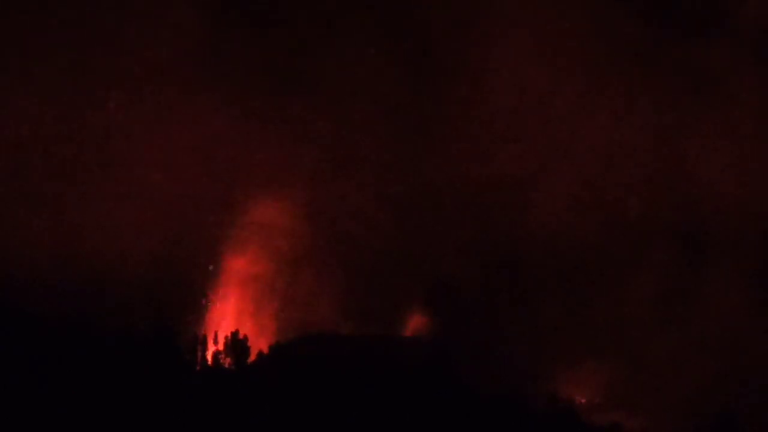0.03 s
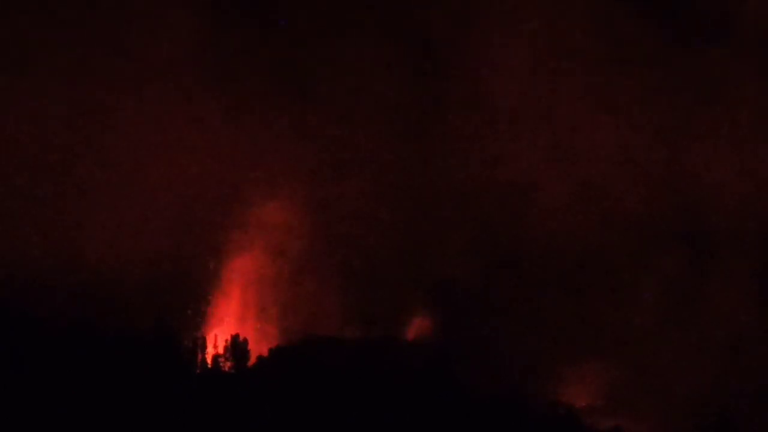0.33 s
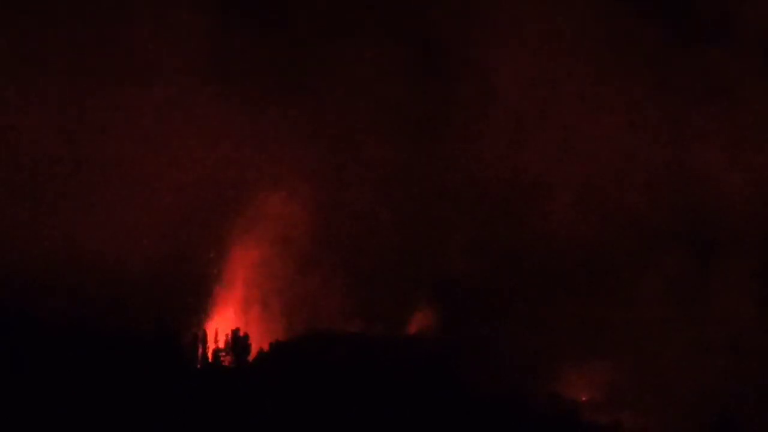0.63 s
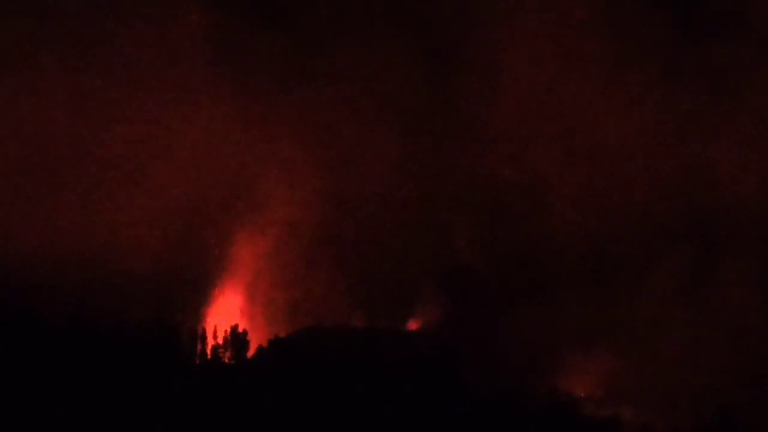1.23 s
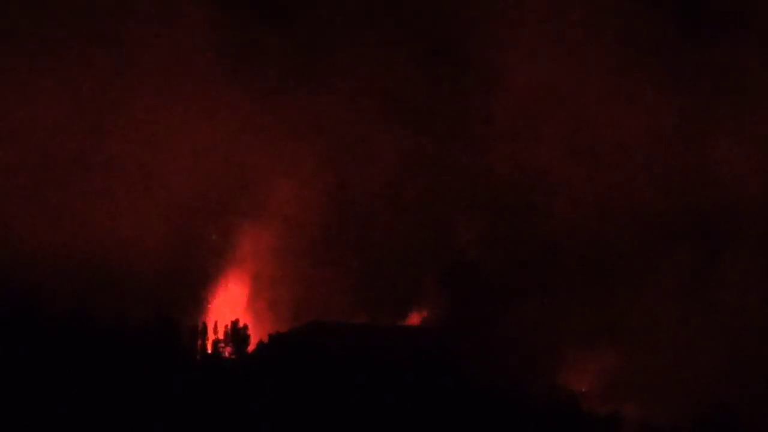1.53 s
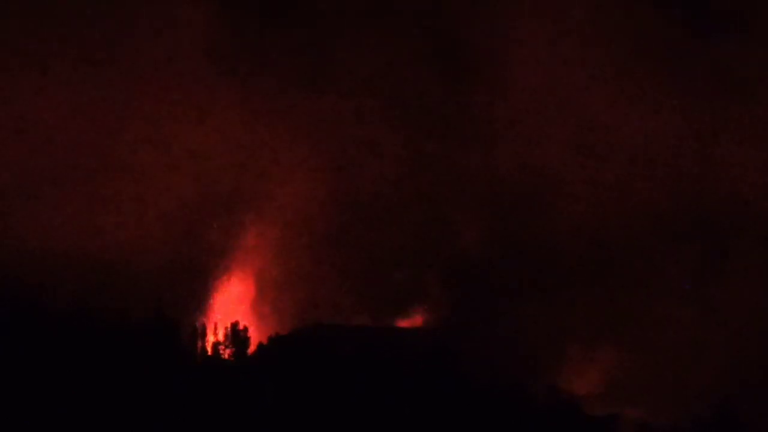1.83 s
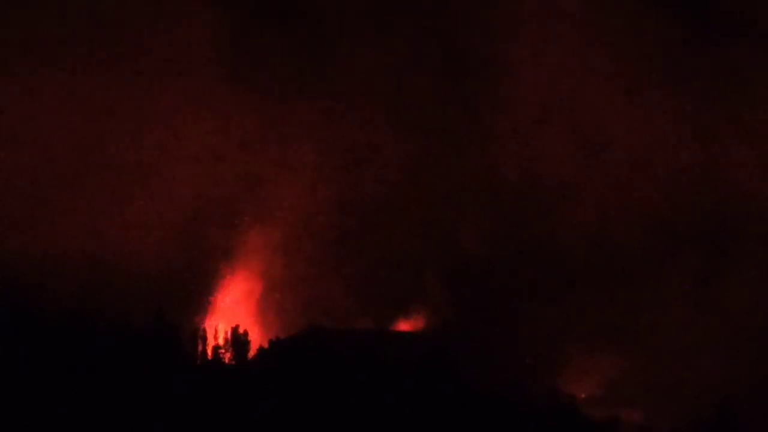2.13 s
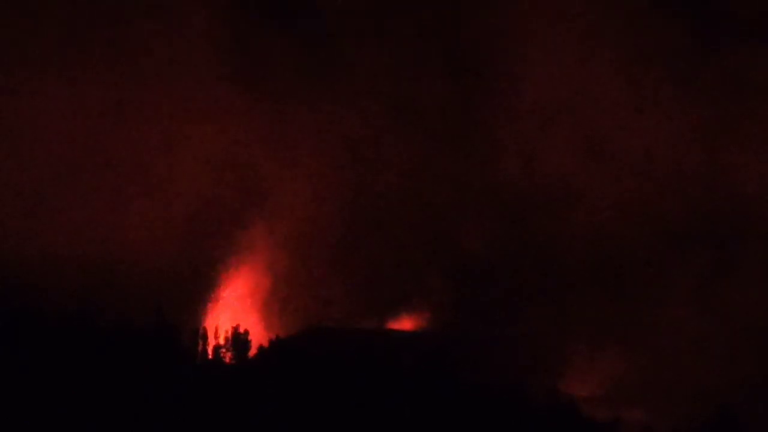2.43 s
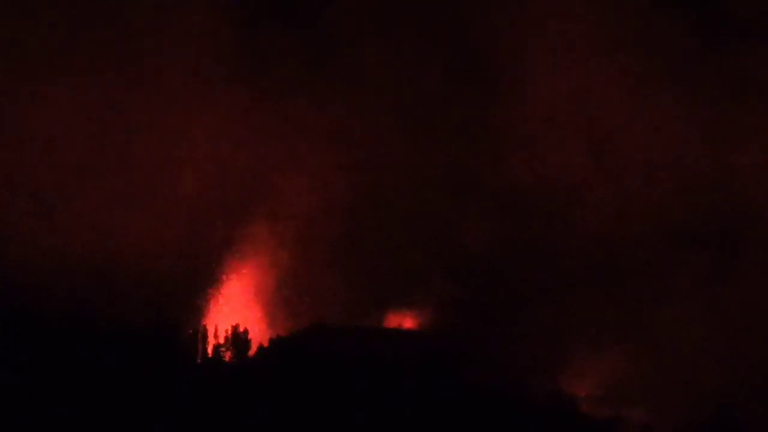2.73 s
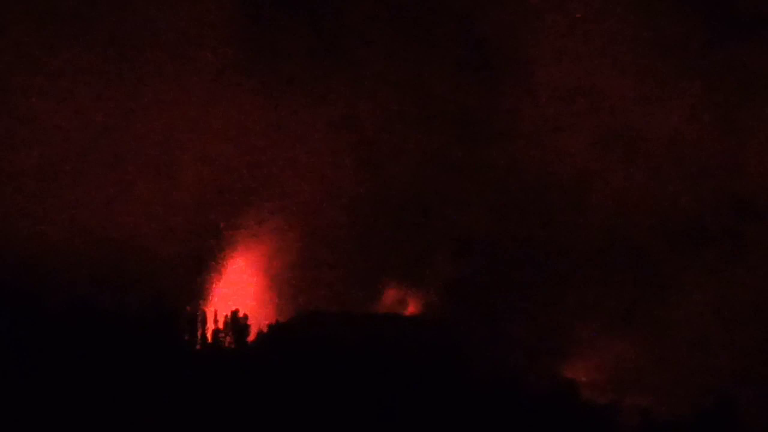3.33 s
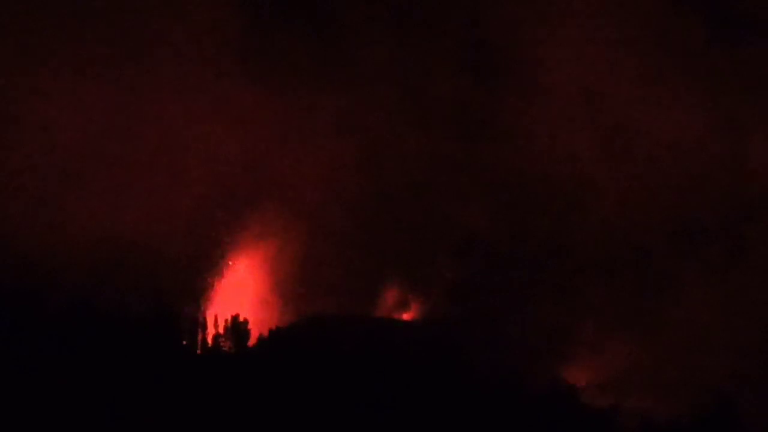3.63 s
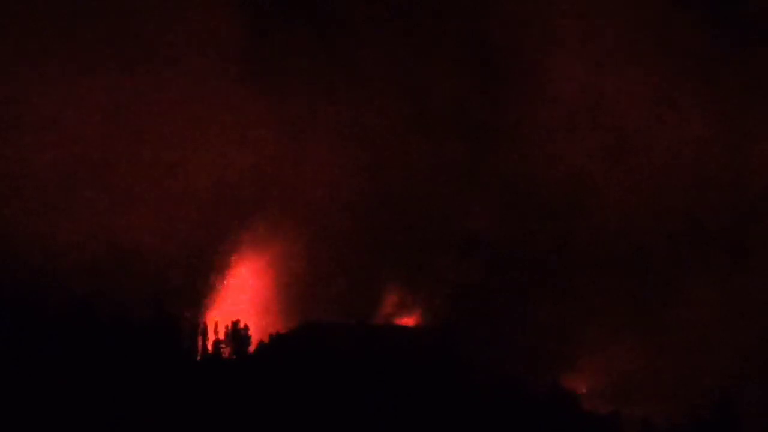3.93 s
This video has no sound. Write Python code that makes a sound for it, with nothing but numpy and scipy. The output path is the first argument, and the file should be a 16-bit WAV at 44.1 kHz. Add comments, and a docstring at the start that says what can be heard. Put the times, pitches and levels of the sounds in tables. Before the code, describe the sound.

Uneven gusts of wind pop and rumble right on the microphone, with thin hiss and a far-off lava fountain barely audible underneath. As the wind weakens, the camera is gripped anew, with two sharp clicks and a light rustle.

```python
"""Short, uneven puffs of wind buffet a hand-held camera's microphone, a few early ones with a slight crack.
Under them the steady wind makes a low rumble that slowly eases. It is night, far from a lava
fountain: its faint roar lies behind the wind, with a thin microphone hiss. The camera ticks faintly
in the hand; near the end it is gripped anew: a low thump, two sharp clicks, a soft rustle."""
import sys
import numpy as np
from scipy import signal
from scipy.fft import rfft, irfft, next_fast_len
from scipy.io import wavfile
from scipy.ndimage import map_coordinates

SR = 44100
rng = np.random.default_rng(int(sys.argv[2]) if len(sys.argv) > 2 else 0)


def log_audio(samples):
    """Write samples as a 16-bit WAV file to the path given in sys.argv[1]."""
    # one column per channel
    frames = np.atleast_2d(samples).T
    # limit to full scale, then quantise
    limited = np.clip(frames, -1, 1)
    pcm = np.round(limited * 32767).astype(np.int16)
    wavfile.write(sys.argv[1], SR, pcm)


N = 176400

# Turbulence right at the microphone, for eddies of EDDY_HZ. Each row: frequency in Hz, density in dB.
EDDY_SPECTRUM = [(30, -9), (100, 5), (200, -0.5), (320, -2), (500, -13.5), (720, -25), (1000, -35.5),
                 (1500, -53), (2500, -68), (7000, -100)]
EDDY_HZ = 300
# Puffs striking the microphone. Each row: centre in seconds, length in seconds,
# level in dB before PUFF_GAIN_DB, eddy frequency in Hz (higher is brighter).
WIND_PUFFS = [(0.009, 0.051, -21.5, 375), (0.033, 0.024, -22.5, 380), (0.13, 0.027, -22.5, 353),
              (0.167, 0.02, -25, 310), (.235, 0.015, -24, 280), (0.264, 0.02, -21.5, 290),
              (0.289, 0.024, -19, 210), (0.308, 0.017, -23.5, 427), (0.397, 0.049, -25.5, 300.6),
              (0.505, 0.025, -18.5, 353), (0.556, 0.03, -23, 330), (0.715, 0.02, -19, 298),
              (0.836, 0.02, -26, 288), (0.891, 0.034, -31.5, 226), (.989, 0.013, -26, 290),
              (1.015, 0.019, -19.5, 327), (1.037, 0.015, -26.5, 355), (1.169, 0.035, -27.5, 333),
              (1.196, 0.0082, -23.5, 290), (1.294, 0.016, -26.5, 300), (1.318, 0.013, -21.5, 240),
              (1.343, 0.036, -20.5, 237), (1.458, 0.035, -24.5, 290), (1.556, 0.019, -26.5, 249),
              (1.621, 0.021, -22.5, 299), (1.649, 0.032, -26, 333), (1.841, 0.027, -29, 282),
              (1.931, 0.028, -25.5, 203), (2.045, 0.016, -30.5, 220), (2.102, 0.0073, -24.5, 237),
              (2.143, 0.019, -23.5, 282), (2.292, 0.044, -27.5, 338), (2.335, 0.009, -23, 235),
              (2.388, 0.012, -22.5, 239), (2.492, 0.022, -27, 330), (2.598, 0.019, -25.5, 230),
              (2.788, 0.013, -18.5, 259), (2.813, 0.035, -26, 289), (2.852, 0.024, -24, 289),
              (3.05, 0.023, -34, 160), (3.393, 0.028, -25, 215), (3.447, 0.05, -24.5, 200),
              (3.534, 0.0059, -25.5, 205), (3.62, 0.01, -27.5, 270), (3.633, 0.014, -21.5, 232),
              (3.87, 0.039, -27.5, 232)]
PUFF_GAIN_DB, PUFF_STEEPNESS = 0.5, 2.54
FLUTTER_DB, FLUTTER_KNOTS_PER_S = 2.5, 210


def wind_puffs(size=16384):
    """Each puff is a ragged swell of turbulence; faster eddies shift its whole spectrum up."""
    out = np.zeros(N)
    t = (np.arange(size) - size // 2) / SR
    for centre, length, db, eddy_hz in WIND_PUFFS:
        knots = 200 + t * FLUTTER_KNOTS_PER_S
        flutter = map_coordinates(rng.standard_normal(400), [knots], mode="mirror")
        swell = np.exp(-.5 * np.abs(2 * t / length) ** PUFF_STEEPNESS)
        colour = lambda hz: gain_at(EDDY_SPECTRUM, hz * EDDY_HZ / eddy_hz)
        eddies = filtered(rng.standard_normal(size), colour)
        pressure = filtered(swell * amp(FLUTTER_DB * flutter) * eddies, mic_low_cut)
        pressure *= np.linalg.norm(swell) / np.linalg.norm(pressure)
        add(out, amp(db + PUFF_GAIN_DB) * pressure, round(centre * SR) - size // 2)
    return out


# Pops of small eddies at the microphone port and, at 3.174 s, the low thump of the camera being
# gripped, under the sharp click. Each row: time in seconds, peak in dB, tone in Hz (higher is brighter).
POPS_AND_THUMP = [(0.034, -15, 460), (.114, -16, 439), (0.129, -16, 350), (.263, -16, 420),
                  (0.267, -13.5, 230), (0.281, -20, 140), (0.2976, -14, 230), (0.306, -16, 430),
                  (0.503, -16, 422), (0.511, -22, 400), (0.542, -16.5, 340), (0.714, -20, 318),
                  (1.007, -15.5, 393), (1.016, -23.5, 383), (1.1835, -18, 380), (1.195, -15.5, 270),
                  (1.457, -17, 302), (1.622, -16, 280), (1.642, -20, 330), (2.137, -20.5, 280),
                  (2.278, -17.5, 390), (2.284, -14, 200), (2.295, -13, 190), (2.306, -17, 200),
                  (2.46, -11.5, 260), (2.488, -10, 310), (2.4958, -13.5, 370), (2.785, -19.5, 290),
                  (2.817, -18, 350), (2.845, -18.5, 367), (3.174, -24, 238), (3.4, -16.5, 220),
                  (3.621, -18.5, 320), (3.636, -13, 245)]


def pops_and_thump(size=4096, tilt_db_per_octave=4, port_top_hz=2420):
    """Each wind pop, and the thump of the grip, is one pressure pulse, a push or a pull."""
    out = np.zeros(N)
    port = lambda hz: mic_low_cut(hz) / (1 + (hz / port_top_hz) ** 4)
    for time, db, tone_hz in POPS_AND_THUMP:
        phase = np.exp(2j * np.pi * rng.random())
        tone = lambda hz: gain_at(EDDY_SPECTRUM, hz * EDDY_HZ / tone_hz)
        tilt = lambda hz: amp(tilt_db_per_octave * np.log2(1 + hz / tone_hz))
        colour = lambda hz: phase * port(hz) * tone(hz) * tilt(hz)
        pulse = filtered(signal.unit_impulse(size, "mid"), colour)
        add(out, amp(db) * pulse / np.abs(pulse).max(), round(time * SR) - size // 2)
    return out


# Slight cracks of microphone overload on a few early puffs. Each row: start in seconds, peak in dB.
OVERLOADS = [(.122, -43), (.2685, -40), (.2898, -39), (1.0055, -43), (1.0175, -41.5)]
# The tone of one crack. Each row: frequency in Hz, density in dB.
CRACK_SPECTRUM = [(1500, 11), (6000, -17), (16000, -25.5)]


def overload_cracks(size=1024):
    """Each brief overload puts one sharp edge on its puff."""
    out = np.zeros(N)
    edge = impulse(lambda hz: gain_at(CRACK_SPECTRUM, hz), size)
    for start, db in OVERLOADS:
        add(out, amp(db) * edge / np.abs(edge).max(), round(start * SR))
    return out


# Steady wind across the microphone. Each row: time in seconds, level in dB before gain_db.
BREEZE_LEVELS = [(.6, -35), (.85, -34.5), (1.15, -42), (1.72, -34), (2.3, -32), (2.7, -36), (2.9, -36),
                 (3.13, -46.5), (3.42, -40.5), (3.8, -42.5)]
# Its rumble ahead of the microphone's bass roll-off. Each row: frequency in Hz, density in dB.
BREEZE_SPECTRUM = [(25, -8.5), (60, 6.5), (110, 5.5), (190, -1), (300, -10), (450, -24.5), (700, -35.5),
                   (1500, -77)]


def breeze(gain_db=2, flutter_db=2):
    """The steady wind makes a dull, fluttering rumble between the puffs."""
    rumble = unit(filtered(noise(BREEZE_SPECTRUM), mic_low_cut))
    return amp(curve(BREEZE_LEVELS) + gain_db + flutter_db * wobble(35)) * rumble


# The camera body, heard at its own microphone. Each row: frequency in Hz, density in dB.
BODY_SPECTRUM = [(900, -2.5), (2700, -8), (4200, -0.5), (5500, -4), (6800, -1.5), (8500, -23), (11000, -23),
                 (12500, -7.5), (15600, -3)]
# The camera ticking in the hand.
# Each row: start in seconds, level in dB, treble tilt in dB per octave, ring frequency in Hz.
HANDLING_CLICKS = [(.7485, -49, -12.5, 3150), (.851, -49, -13.5, 3400), (2.984, -57.5, -5.5, 3900),
                   (3.055, -51, -12.5, 3900), (3.171, -30, -13, 4070), (3.2013, -46.5, -12, 4020),
                   (3.391, -43.5, 0.5, 6200), (3.4345, -32, 0.5, 3800)]
SNAP_S = 0.00084  # a snap has the energy of its level held this long
RING_DB, RING_WIDTH_HZ = 8, 320  # resonance of the part that is touched
RATTLE_DB, RATTLE_T60_S = -14, .05


def handling_clicks(size=4096):
    """Dry snaps of the camera body: one blow, a short ring and a faint rattle."""
    out, t = np.zeros(N), np.arange(size) / SR
    for start, db, tilt, ring_hz in HANDLING_CLICKS:
        ring = lambda hz: RING_DB / (1 + ((hz - ring_hz) / RING_WIDTH_HZ) ** 2)
        colour = lambda hz: gain_at(BODY_SPECTRUM, hz) * amp(tilt * np.log2(1 + hz / 2000) + ring(hz))
        rattle = amp(-60 * t / RATTLE_T60_S) * filtered(rng.standard_normal(size), colour)
        snap = unit(impulse(colour, size)) + amp(RATTLE_DB) * unit(rattle)
        add(out, amp(db) * snap * np.sqrt(SNAP_S * SR / size), round(start * SR))
    return out


# A light brush of the hand, close to the microphone. Each row: time in seconds, level in dB.
BRUSH_LEVELS = [(.45, -100), (.72, -72), (.92, -71.5), (1.2, -100)]
# The tone of that brush. Each row: frequency in Hz, density in dB.
BRUSH_SPECTRUM = [(700, -4.5), (1650, 0), (3500, -11.5), (9000, -30)]
# Fingers sliding to a new grip. Each row: time in seconds, level in dB.
SLIDE_LEVELS = [(3.15, -110), (3.23, -79.5), (3.29, -62.5), (3.345, -67.5), (3.39, -61.5), (3.47, -69.5),
                (3.53, -61.5), (3.58, -66.5), (3.75, -95.5), (4, -110)]


def hand_rustle(grain_db=7.5):
    """A hand brushes the camera; later the fingers slide over it in fine, even grains."""
    slide = unit(noise(BODY_SPECTRUM) * amp(grain_db * np.tanh(wobble(300))))
    return amp(curve(SLIDE_LEVELS)) * slide + amp(curve(BRUSH_LEVELS)) * noise(BRUSH_SPECTRUM)


# The lava fountain, far off in the night. Each row: time in seconds, level in dB about level_db.
FOUNTAIN_SWELL = [(0, 4.5), (.8, 3.5), (1.15, 0.5), (3.2, -4), (4, 0.5)]
# Its roar from this distance. Each row: frequency in Hz, density in dB.
FOUNTAIN_SPECTRUM = [(60, -8.5), (300, -0.5), (600, -1), (1000, -9), (1500, -17.5), (2200, -30),
                     (4000, -54)]


def lava_fountain(level_db=-59):
    """The distant eruption arrives as a faint, wavering roar."""
    return amp(level_db + curve(FOUNTAIN_SWELL) + wobble(6)) * noise(FOUNTAIN_SPECTRUM)


# The microphone's noise floor. Each row: frequency in Hz, density in dB.
HISS_SPECTRUM = [(500, -1.5), (2500, -1.5), (4300, -1), (5400, -10), (6700, -3), (8500, -15.5),
                 (11000, -22.5), (12200, -4), (13400, -4), (15600, -1.5)]


def mic_hiss(level_db=-72):
    """The microphone adds a thin, steady hiss of its own."""
    return amp(level_db) * noise(HISS_SPECTRUM)


def mic_low_cut(hz, corner_hz=87.2, leak_db=-32.5):
    """Gain of the microphone's bass roll-off; a little rumble slips under it."""
    steep = (hz / corner_hz) ** 5
    return (steep + amp(leak_db) * hz / (hz + 10)) / (1 + steep)


def amp(db):
    """Gain of a level in dB."""
    return 10 ** (np.asarray(db) / 20)


def unit(x):
    """Scaled to rms 1."""
    return x / np.sqrt(np.mean(x ** 2) + 1e-20)


def gain_at(spectrum, hz):
    """Gain from (Hz, dB) rows, read on a log frequency axis."""
    row_hz, row_db = np.transpose(spectrum)
    return amp(np.interp(np.log(hz + 1), np.log(row_hz + 1), row_db))


def curve(rows):
    """(seconds, value) rows as one value per sample."""
    return np.interp(np.arange(N) / SR, *np.transpose(rows))


def wobble(rate):
    """A smooth random curve, rate knots a second."""
    return map_coordinates(rng.standard_normal(4000), [np.arange(N) * rate / SR + 2], mode="mirror")


def filtered(x, response):
    """x passed through a frequency response."""
    size = next_fast_len(len(x) + 8192)
    return irfft(rfft(x, size) * response(np.fft.rfftfreq(size, 1 / SR)), size)[:len(x)]


def noise(spectrum):
    """Coloured noise of rms 1."""
    return unit(filtered(rng.standard_normal(N), lambda hz: gain_at(spectrum, hz)))


def impulse(gain, size):
    """The sharp, then dying (minimum-phase) response to one blow, for a gain over frequency."""
    magnitude = np.maximum(gain(np.fft.rfftfreq(size, 1 / SR)), 1e-6)
    cepstrum = irfft(np.log(magnitude))
    cepstrum[1:size // 2] *= 2
    cepstrum[size // 2 + 1:] = 0
    return irfft(np.exp(rfft(cepstrum)))


def add(track, x, start):
    """Mix x into the track from a start sample on."""
    a, b = max(start, 0), min(start + len(x), N)
    track[a:b] += x[a - start:b - start]


def scene():
    """Wind, eruption and handling at one microphone."""
    buffeting = wind_puffs() + pops_and_thump() + overload_cracks() + breeze()
    background = lava_fountain() + mic_hiss()
    handling = handling_clicks() + hand_rustle()
    return (buffeting + background + handling)[None]


def record(dry):
    """The camera keeps nothing above its band limit."""
    top_hz = 15900
    return np.array([filtered(x, lambda hz: hz < top_hz) for x in dry])


dry = scene()
out = record(dry)
log_audio(out)
```